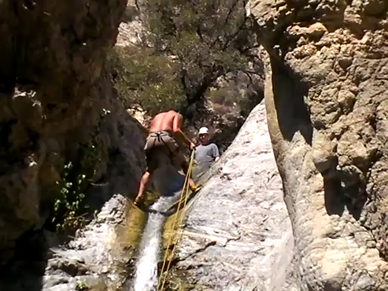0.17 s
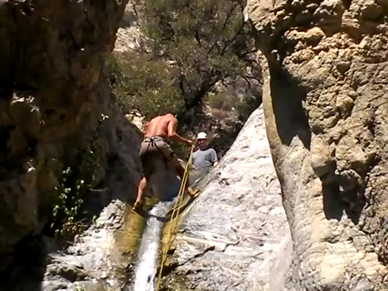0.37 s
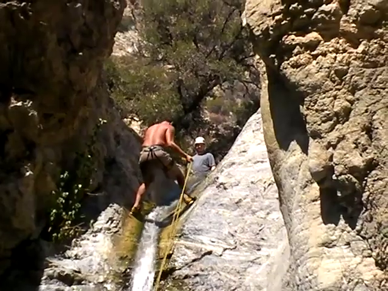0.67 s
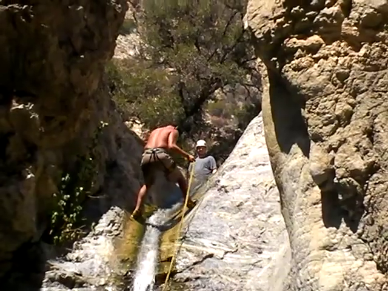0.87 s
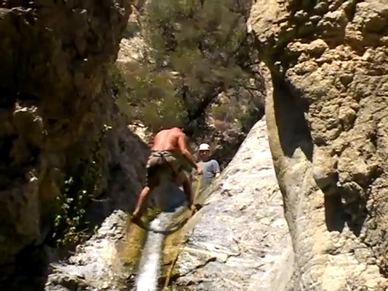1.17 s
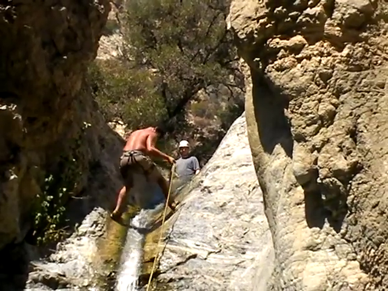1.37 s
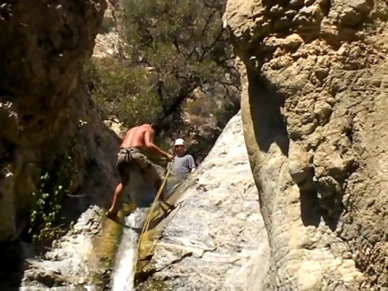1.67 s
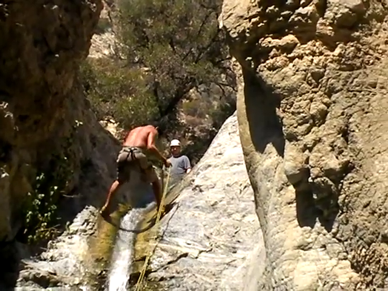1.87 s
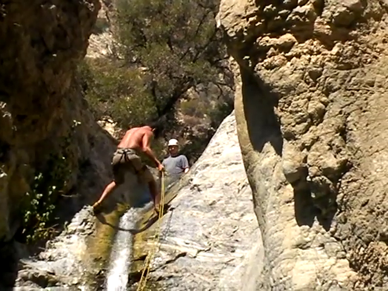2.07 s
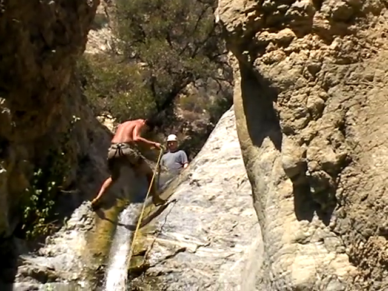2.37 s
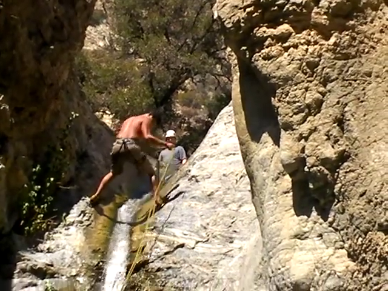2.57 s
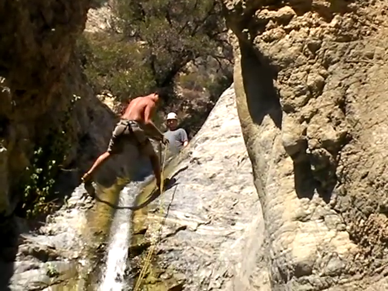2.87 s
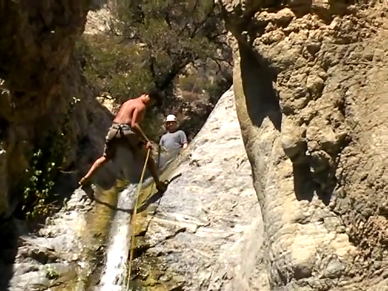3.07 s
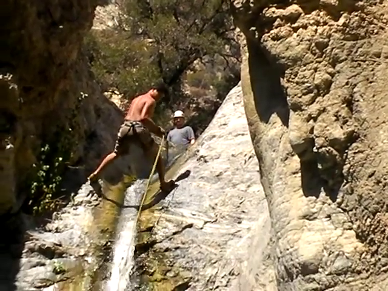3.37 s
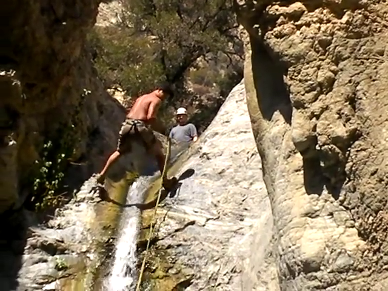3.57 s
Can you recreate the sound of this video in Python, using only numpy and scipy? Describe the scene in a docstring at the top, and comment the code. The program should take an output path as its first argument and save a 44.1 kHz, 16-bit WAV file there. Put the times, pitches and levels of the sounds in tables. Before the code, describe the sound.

After a tiny silence, a waterfall enters abruptly at about 0.1 s and rushes without pause to the end. It is bright, dense and hissy, with little bass, fine crackling drops, bubble patter and very slight surges. A faint low hollow hum lies beneath. A light, short knock comes near 2.0 s; barely audible soft low bumps occur near 2.0, 2.4 and 2.6 s. Wide stereo.

```python
"""In a canyon, a narrow waterfall pours down a rock chute and splashes close by.
Coloured noise makes a bright, steady rush that surges slightly; random clicks make its drops and bubble patter.
The rock hollow hums faintly as filtered noise, with a few soft low bumps and one light knock.
Two ports hear it, partly alike; a low cut, a narrow treble notch and a top limit shape the whole."""
import sys
import numpy as np
from scipy import signal
from scipy.fft import rfft, irfft
from scipy.io import wavfile
from scipy.ndimage import uniform_filter1d

SR = 44100
rng = np.random.default_rng(int(sys.argv[2]) if len(sys.argv) > 2 else 0)


def waveform_to_disk(signal):
    """Save audio, clipped to [-1, 1], as 16-bit WAV at the path in sys.argv[1]."""
    frames = np.transpose(np.atleast_2d(signal))
    scaled = np.clip(frames, -1, 1) * 32767
    samples = np.round(scaled).astype(np.int16)
    wavfile.write(sys.argv[1], SR, samples)


N = 163611

# Tone of the falling water. Each row: frequency in Hz, relative density in dB per Hz.
WATER_SPECTRUM = [(20, -28), (65, -49), (100, -35), (150, -32.5), (240, -29), (280, -20.5), (420, -14.5),
                  (590, -12.5), (710, -6), (930, -6), (1060, -8.5), (1180, -3.5), (1350, -3.5),
                  (1550, -6.5), (2000, -3.5), (2500, -4.5), (3200, -2.5), (4800, 0.5), (6000, 3),
                  (6700, 0.84), (7500, 0.2), (8600, 6.5), (9800, 2.5), (11300, 0.5), (13300, 1.2),
                  (14300, -1), (15000, -7)]
# Surges of the spray. Each row: time in seconds, level change in dB.
SPRAY_SURGES = [(0.09, -0.3), (0.31, 0.3), (0.35, -0.5), (0.42, 1), (0.55, -1.2), (0.68, 0.5), (0.82, -0.5),
                (0.99, 0.3), (1.08, -0.4), (1.49, 0.17), (1.87, -0.6), (1.99, 1.0), (2.04, 0.2),
                (2.28, -0.1), (2.75, -0.3), (3.36, 0.7), (3.51, -0.4), (3.7, 0.1)]
# Hum of the rock hollow. Each row: pitch in Hz, half-width in Hz, level in dB with the waver included,
# before the ports.
HOLLOW_HUMS = [(191, 23.6, -63), (380.3, 11, -60)]
# Soft low bumps. Each row: centre in seconds, length in seconds, pitch in Hz, level in dB.
LOW_BUMPS = [(0.262, .04, 65, -65), (2.016, .026, 128, -48), (2.43, .04, 210, -50),
             (2.595, 0.097, 186, -50)]
# Likeness of the two ports. Each row: frequency in Hz, likeness from 0 to 1.
PORT_LIKENESS = [(60, 0.75), (130, .8), (280, .94), (550, 0.99), (900, .9), (1550, .88), (2250, .97),
                 (3000, .92), (4200, .54), (7000, .48), (9000, .35), (14000, .39)]
# Lead of the left port. Each row: frequency in Hz, phase in radians.
LEFT_LEAD = [(50, -0.5), (1400, -0.24), (2800, -1), (4400, 0.75), (6800, 0.66), (8300, 1.48), (9500, 1.65),
             (11200, 1.9), (13500, 3)]
# Left port minus right. Each row: frequency in Hz, difference in dB.
PORT_BALANCE = [(100, -1.5), (400, 0.9), (2600, 0), (6100, 1), (6900, -0.5), (8600, -2.5), (10500, 0),
                (12900, -1.5), (14700, 4.5)]

RUSH_DB = -16
SURGE_DB, SPLASH_DB, PATCH_DB, FLICKER_DB = 0.11, 0.23, 0.74, 0.5  # rms swings, slow to quick
DROPS_PER_S, DROP_SPREAD_DB, DROP_DB = 4000, 2.8, -24.5
BUBBLES_PER_S, BUBBLE_SPREAD_DB, BUBBLE_DB = 450, 3.5, -35
BUBBLE_CYCLES = 18  # cycles in one decay time
KNOCK_S, KNOCK_DECAY_S, KNOCK_DB = 2.008, 0.012, -27
KNOCK_HZ, KNOCK_WIDTH_HZ = 1120, 220
LOW_CUT_HZ, TOP_LIMIT_HZ = 60, 15120
NOTCH_HZ, NOTCH_WIDTH_HZ, NOTCH_SHOULDER_HZ = 7876, 190, 213
OPEN_S, FADE_IN_S = 0.072, 0.015


def amp(db):
    """Turns decibels into gain."""
    return 10 ** (np.asarray(db) / 20)


def unit(x):
    """Scales to rms 1."""
    return x / np.sqrt(np.mean(x ** 2) + 1e-20)


def read(points, hz):
    """Reads a table on a log-frequency axis."""
    f, value = np.transpose(points)
    return np.interp(np.log(hz + 1), np.log(np.sort(f) + 1), value)


def drift(shape, time_size, band_size):
    """Smooths noise over frames and bands into a random field of rms 1."""
    field = rng.standard_normal(shape)
    for _ in range(2):
        field = uniform_filter1d(field, time_size, axis=0, mode="wrap")
        field = uniform_filter1d(field, band_size, axis=1, mode="wrap")
    return unit(field - field.mean())


def colour(x):
    """Gives a signal the spectrum of the falling water."""
    hz = np.fft.rfftfreq(N, 1 / SR)
    return unit(irfft(rfft(x) * amp(read(WATER_SPECTRUM, hz)), N))


def rush():
    """Countless impacts merge into noise; clumps of water lift wide bands for a moment."""
    bands = signal.stft(rng.standard_normal((2, N)), nperseg=256, noverlap=192)[2]
    shape = bands.shape[:0:-1]  # frames, bands
    level_db = (SURGE_DB * drift((shape[0], 1), time_size=60, band_size=1)
                + SPLASH_DB * drift(shape, time_size=42, band_size=36)
                + PATCH_DB * drift(shape, time_size=28, band_size=5)
                + FLICKER_DB * drift(shape, time_size=8, band_size=40))
    sound = signal.istft(bands * amp(level_db.T), nperseg=256, noverlap=192)[1][:, :N]
    return amp(RUSH_DB) * colour(sound)


def impacts(per_s, spread_db):
    """Scatters clicks at random times and signs, mostly small, a few large."""
    size = amp(spread_db * np.minimum(rng.exponential(1, N), 3.5))
    sign = rng.choice([-1, 1], N)
    return size * sign * (rng.random(N) < per_s / SR)


def drops():
    """Near drops slap the wet rock as separate clicks with the colour of the water."""
    clicks = np.array([impacts(DROPS_PER_S, DROP_SPREAD_DB) for _ in range(2)])
    return amp(DROP_DB) * colour(clicks)


def bubbles(low_hz=740, high_hz=6000, rise=0.02, count=30):
    """Small bubbles ring briefly in the pool, rising a little in pitch."""
    patter = np.zeros(N)
    for hz in np.geomspace(low_hz, high_hz, count):
        age = np.arange(0, 6, hz / BUBBLE_CYCLES / SR)  # in decay times
        envelope = (1 - np.exp(-10 * age)) * np.exp(-age)
        ring = envelope * np.sin(2 * np.pi * BUBBLE_CYCLES * (age + rise * age ** 2 / 2))
        clicks = impacts(BUBBLES_PER_S / count, BUBBLE_SPREAD_DB)
        patter += (hz / low_hz) ** 0.7 * signal.oaconvolve(clicks, ring)[:N]
    # half a length apart, the same patter serves as a second signal
    return amp(BUBBLE_DB) * unit(np.array([patter, np.roll(patter, N // 2)]))


def knock():
    """A light knock, a short burst of band noise, sounds in opposite phase at the two ports."""
    age = np.arange(N) / SR - KNOCK_S
    band = np.exp(-((np.fft.rfftfreq(N, 1 / SR) - KNOCK_HZ) / KNOCK_WIDTH_HZ) ** 2)
    ring = unit(irfft(rfft(rng.standard_normal(N)) * band, N))
    envelope = np.clip(age / 0.002, 0, 1) * np.exp(-abs(age) / KNOCK_DECAY_S)
    sound = amp(KNOCK_DB) * ring * envelope
    return np.array([sound, -sound])


def hollow(waver_db=1.8):
    """The roar excites narrow low resonances between the rock walls; they come and go."""
    f = np.fft.rfftfreq(N, 1 / SR)
    out = np.zeros((2, N))
    for hz, width, db in HOLLOW_HUMS:
        resonance = 1 / (1 + ((f - hz) / width) ** 4)
        hum = irfft(rfft(rng.standard_normal((2, N))) * resonance, N)
        waver = amp(waver_db * drift((N, 1), time_size=4000, band_size=1).T)
        out += amp(db) * unit(hum * waver)
    return out


def bumps():
    """Faint, rounded low thuds under the roar: sines in bell-shaped envelopes."""
    t = np.arange(N) / SR
    out = np.zeros(N)
    for centre, length, hz, db in LOW_BUMPS:
        bell = np.exp(-2 * np.pi * ((t - centre) / length) ** 2)
        tone = np.sqrt(2) * np.sin(2 * np.pi * (hz * t + rng.random()))
        out += amp(db) * bell * tone
    return out


def ports(pair):
    """Blends two unrelated signals into the partly alike, phase-shifted sound at the two ports."""
    hz = np.fft.rfftfreq(N, 1 / SR)
    a, b = rfft(pair)
    same = np.clip(read(PORT_LIKENESS, hz), 0, 1)
    tilt = amp(read(PORT_BALANCE, hz) / 2)
    right = (same * a + np.sqrt(1 - same ** 2) * b) * np.exp(-1j * read(LEFT_LEAD, hz))
    return irfft(np.array([a * tilt, right / tilt]), N)


def scene():
    """Mixes the water and hum at the two ports, then adds the knock and the bumps."""
    surge = amp(np.interp(np.arange(N) / SR, *np.transpose(SPRAY_SURGES)))
    water = surge * (rush() + drops()) + bubbles()
    return ports(water + hollow()) + knock() + bumps()


def record(dry):
    """Applies a low cut, a narrow treble notch, a quick fade-in from silence and the top limit."""
    hz = np.fft.rfftfreq(N, 1 / SR)
    off = abs(hz - NOTCH_HZ)
    notch = (1 - np.exp(-(off / NOTCH_WIDTH_HZ) ** 6)) * off / np.hypot(off, NOTCH_SHOULDER_HZ)
    low_cut = hz ** 3 / np.hypot(hz ** 3, LOW_CUT_HZ ** 3)
    fade_in = np.clip((np.arange(N) / SR - OPEN_S) / FADE_IN_S, 0, 1)
    sound = irfft(rfft(dry) * notch * low_cut, N) * fade_in
    top_limit = signal.firwin(801, TOP_LIMIT_HZ, window=("kaiser", 8), fs=SR)
    return signal.oaconvolve(sound, top_limit[None], "same")


dry = scene()
out = record(dry)
waveform_to_disk(out)
```